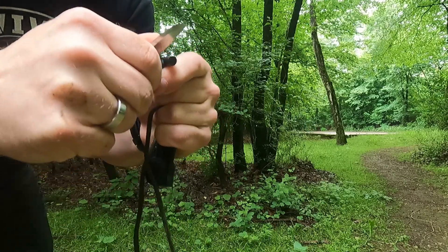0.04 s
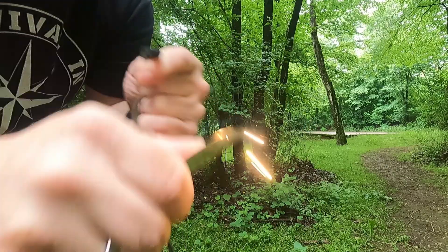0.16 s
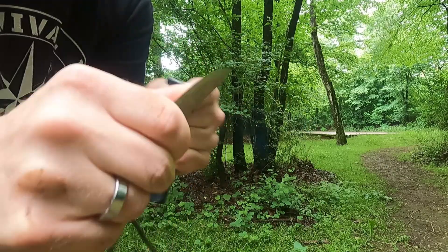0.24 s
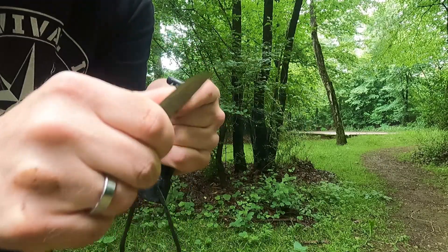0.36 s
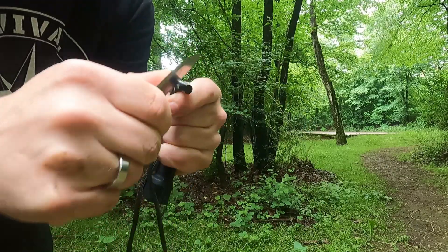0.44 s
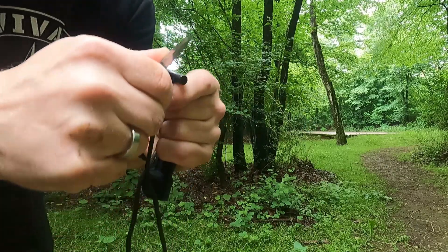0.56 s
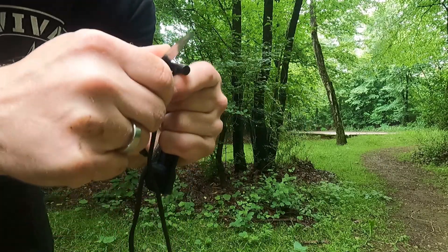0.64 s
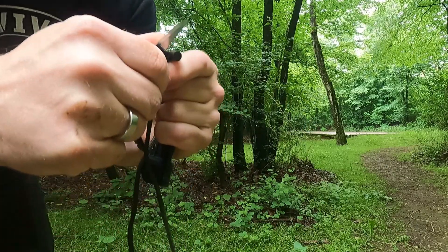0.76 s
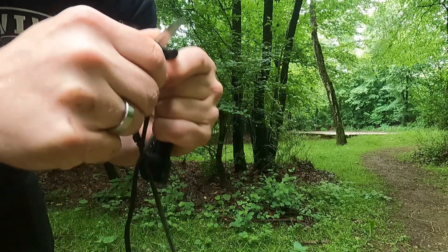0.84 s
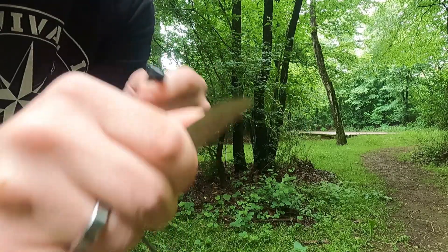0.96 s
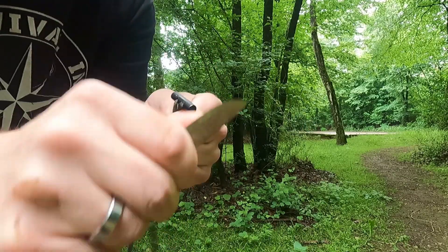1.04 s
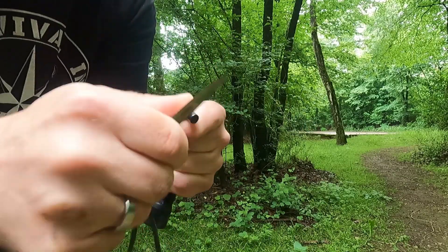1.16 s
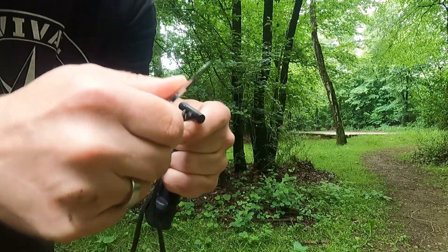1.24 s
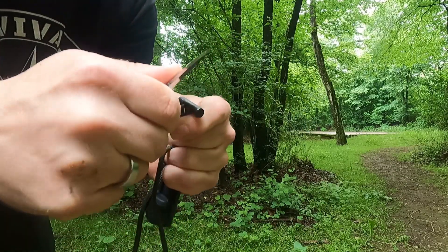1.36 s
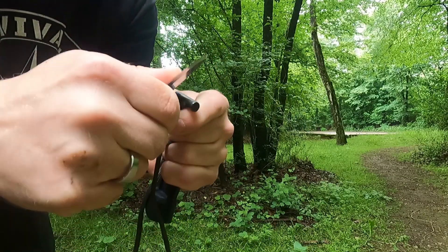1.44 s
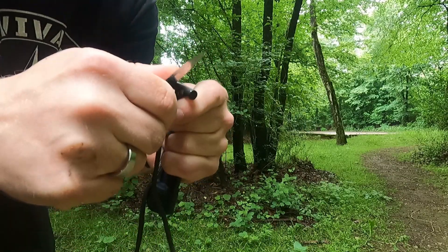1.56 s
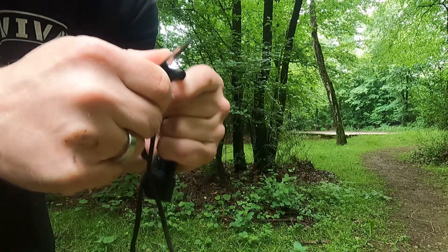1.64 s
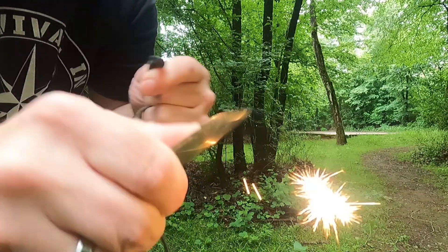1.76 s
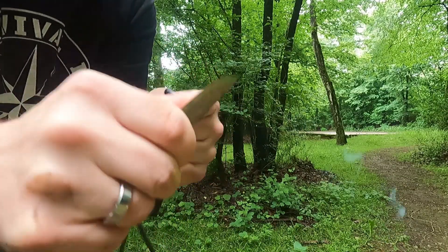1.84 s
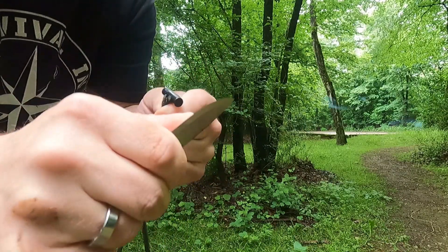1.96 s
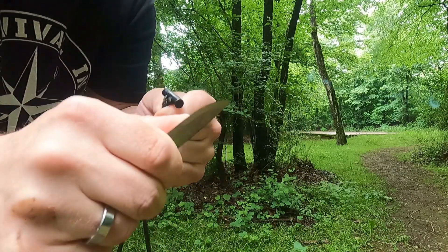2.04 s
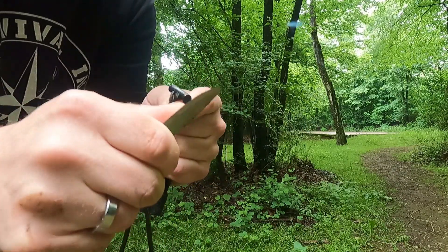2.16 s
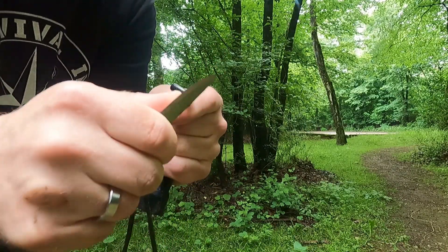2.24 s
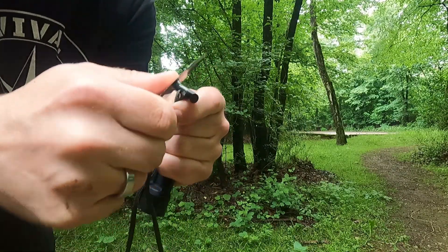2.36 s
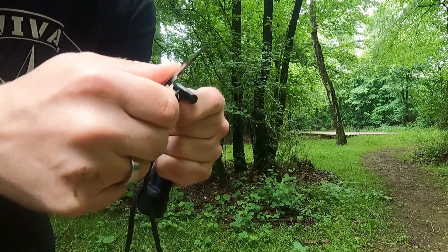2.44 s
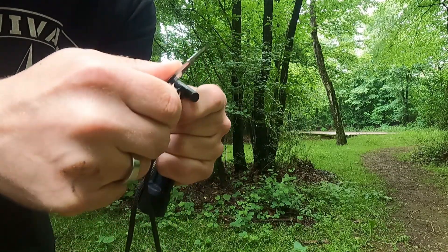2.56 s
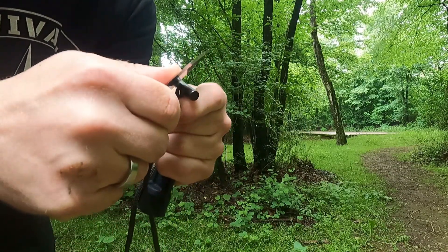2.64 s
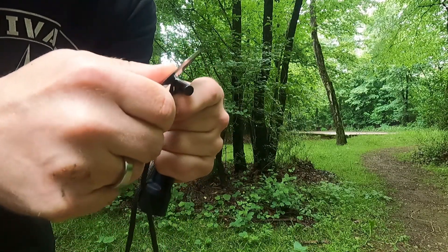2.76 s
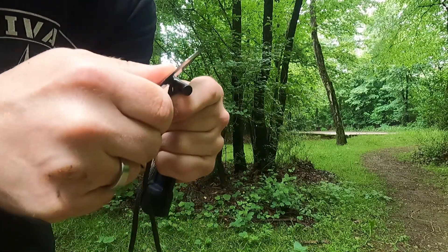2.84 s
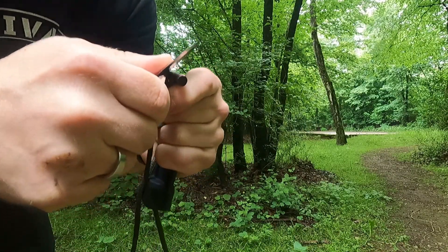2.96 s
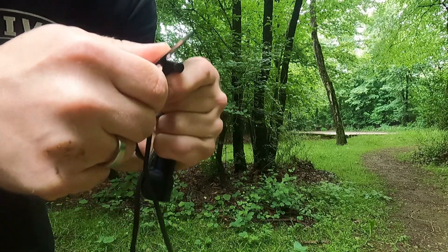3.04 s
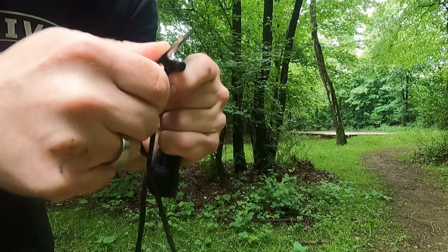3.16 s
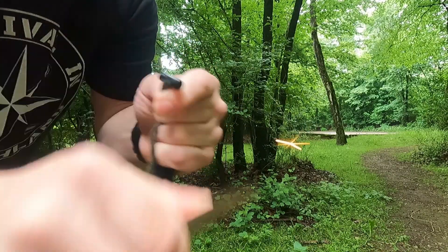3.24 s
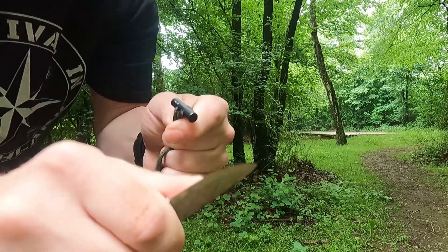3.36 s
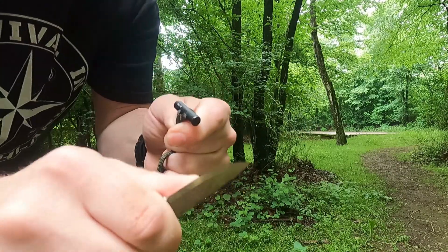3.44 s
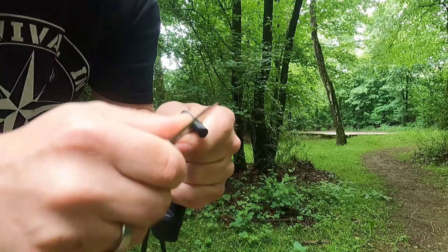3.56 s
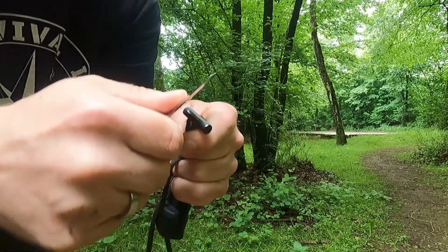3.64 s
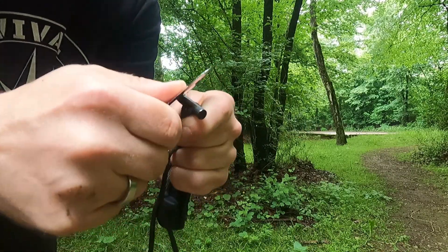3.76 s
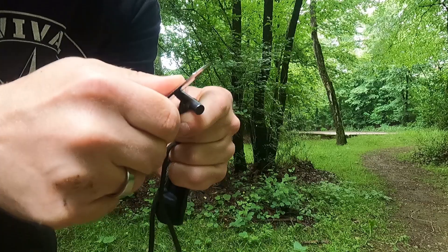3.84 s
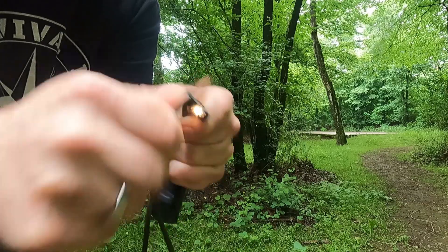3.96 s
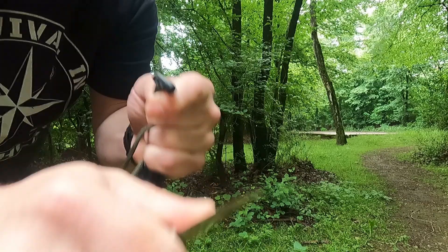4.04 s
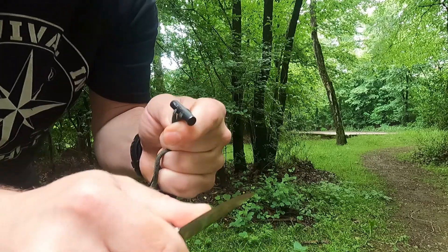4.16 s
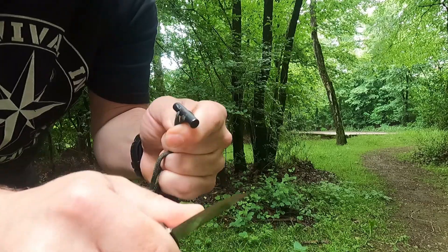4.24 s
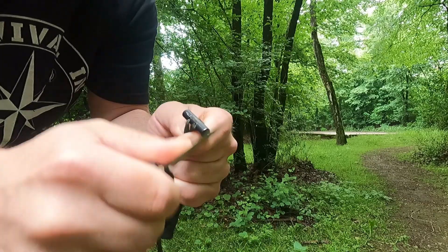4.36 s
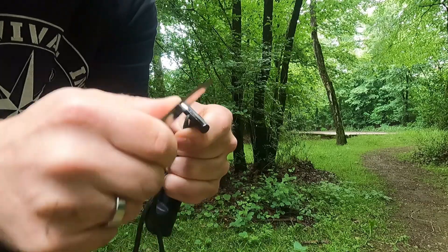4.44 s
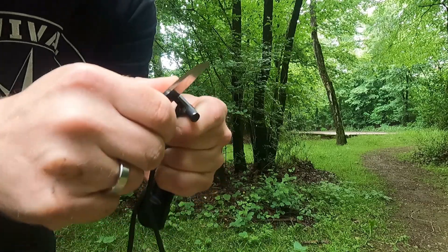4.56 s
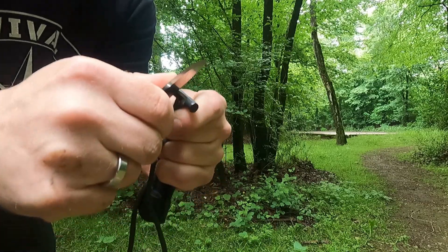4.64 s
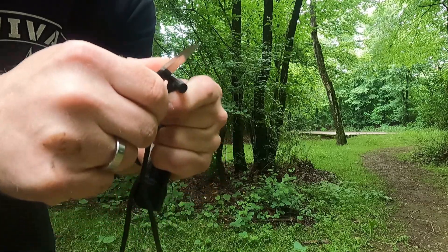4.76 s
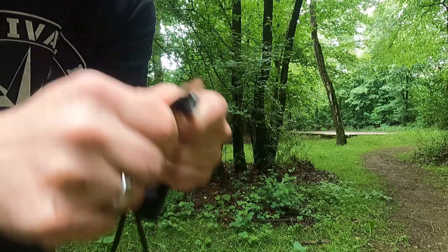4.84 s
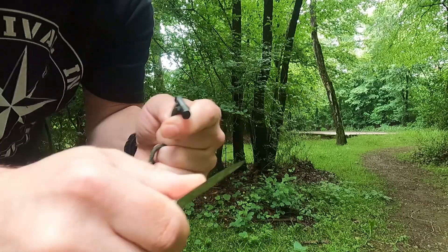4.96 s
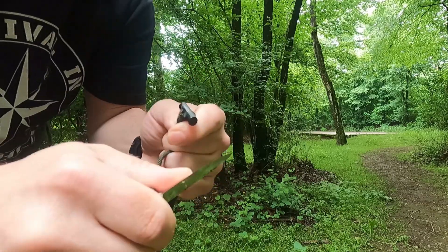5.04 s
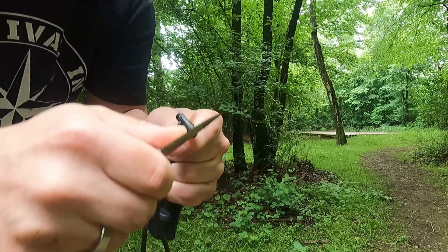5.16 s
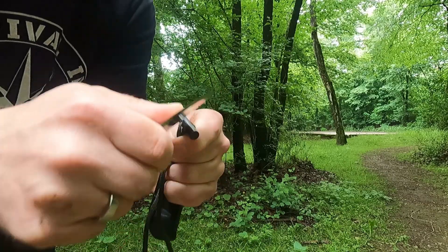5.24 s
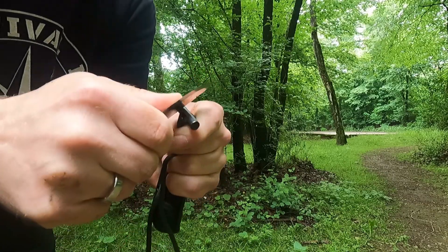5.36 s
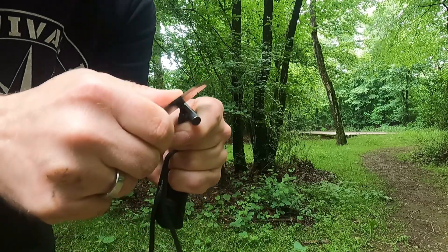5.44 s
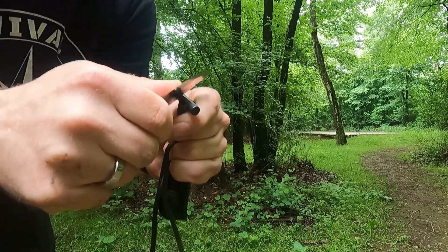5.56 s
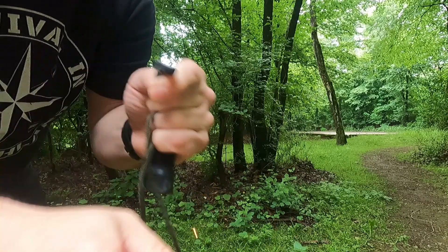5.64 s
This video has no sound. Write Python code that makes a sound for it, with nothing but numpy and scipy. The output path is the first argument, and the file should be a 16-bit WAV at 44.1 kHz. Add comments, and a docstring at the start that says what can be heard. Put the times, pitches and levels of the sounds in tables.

```python
"""A faint bird note and a low hum come first, then a knock: a knife blade on a ferro rod, close to a small camera.
The spine scrapes in short strokes, each a run of noise bursts ringing steel modes; a light knock ends it, set down.
Songbirds are gliding near-sines among trees, whose trunks smear each note through a tail of decaying noise.
Behind them shaped noise makes the air, a far chorus and a low rumble; a wavering hum comes and goes."""
import sys
import numpy as np
from scipy import signal
from scipy.fft import rfft, irfft
from scipy.io import wavfile
from scipy.ndimage import uniform_filter1d

SR = 44100
rng = np.random.default_rng(int(sys.argv[2]) if len(sys.argv) > 2 else 0)


def store_pcm(level_fs):
    """Save levels as 16-bit WAV."""
    pcm = np.round(np.clip(level_fs, -1, 1) * 32767).astype(np.int16)
    wavfile.write(sys.argv[1], SR, np.atleast_2d(pcm).T)


N = 251987


def gain_of(db):
    """dB to amplitude."""
    return 10 ** (np.asarray(db) / 20)


def evened(x):
    """Scales to rms 1."""
    return x / np.sqrt(np.mean(x ** 2) + 1e-20)


def smooth(x, size):
    """Three running means in a row."""
    for _ in range(3):
        x = uniform_filter1d(x, size)
    return x


def read(points, hz):
    """Reads a table on a log-frequency axis."""
    f, value = np.transpose(points)
    return np.interp(np.log(hz + 1), np.log(f + 1), value)


def add(mix, s, sound):
    """Mixes a sound in at s seconds."""
    part = mix[round(s * SR):][:len(sound)]
    part += sound[:len(part)]


def knife():
    """All bites and knocks of blade on rod, as the left and right microphone ports meet them."""
    # Strokes down the rod. Each row: start in seconds, end in seconds, thud of the hands at the end in dB,
    # top ring at its loudest in dB, moment of the loudest top ring in seconds.
    strokes = [(.234, 0.287, -31.5, -36.5, .273), (.998, 1.028, -36.5, -42.5, 1.02),
               (1.825, 1.883, -28, -30.5, 1.855), (1.894, 1.935, -25.5, -33, 1.899),
               (3.328, 3.361, -35.5, -36.5, 3.343), (4.077, 4.131, -27.5, -31, 4.11),
               (4.953, 4.969, -55, -49.5, 4.956), (5.0, 5.005, -61, -44, 5.001),
               (5.032, 5.045, -58, -39.5, 5.033)]
    # Single hard knocks. Each row: start in seconds, level in dB, length in ms, chatter pitch in Hz,
    # top ring in dB against the knock.
    knocks = [(0.0757, -25.5, 1.2, 2630, -41), (0.753, -25, 2.06, 4500, -37), (1.642, -25, 2.9, 4800, -28),
              (2.8065, -29.5, 1.4, 2760, -45), (3.891, -29, 3.7, 4630, -28), (4.643, -39, 2.4, 4500, -32),
              (4.7333, -30, 3, 4450, -34), (5.0086, -20.5, 3.2, 4500, -11), (5.0297, -9.5, 2.7, 4680, -12),
              (5.495, -31.5, 1.4, 4700, -49)]
    knock_thud_db = -23  # against the knock
    rows = [(s, db, ms, hz, knock_thud_db, top_db) for s, db, ms, hz, top_db in knocks]
    for row in strokes:
        rows += stroke(*row)
    out = np.zeros((N, 2))
    draws = rng.standard_normal((len(rows), 3, 2048))
    for row, draw in zip(rows, draws):
        add(out, row[0], bite(row, draw).T)
    return out.T


def stroke(start, end, thud_db, top_db, top_s):
    """In a stroke the edge bites, slips and bites again; hard bites let go sooner and softer ones hold longer."""
    # Bites of the edge. Each row: start in seconds, level in dB, chatter pitch in Hz.
    bites = [(0.236, -30, 3200), (0.2451, -25, 3200), (0.2508, -22, 3220), (0.256, -21.5, 2700),
             (0.2712, -29, 4140), (0.2756, -20.5, 4330), (0.2806, -31.5, 2450), (0.9981, -29, 3000),
             (1.0023, -32, 3460), (1.0049, -24.5, 3120), (1.0109, -18, 2980), (1.019, -37, 2920),
             (1.8265, -35, 3940), (1.831, -30, 3480), (1.8412, -24.5, 3520), (1.85, -18, 4500),
             (1.8555, -18, 4870), (1.86, -29, 3320), (1.87, -20.5, 3280), (1.872, -28.5, 1800),
             (1.8798, -25, 1900), (1.896, -32, 3350), (1.9, -18, 4240), (1.9095, -19.5, 3450),
             (1.9189, -34.5, 2700), (1.9336, -35, 3170), (3.329, -26.5, 3030), (3.335, -22.5, 2900),
             (3.3393, -19.5, 4850), (3.3485, -31, 2800), (3.3583, -29, 4250), (4.0787, -32.5, 5000),
             (4.085, -31.5, 4500), (4.091, -33, 4760), (4.095, -22, 4700), (4.1002, -16.5, 4650),
             (4.1065, -23, 3900), (4.1082, -16.5, 4530), (4.1137, -35, 2600), (4.1219, -21.5, 3600),
             (4.953, -41.5, 3600), (4.999, -35, 5300), (5.032, -28, 4510), (5.042, -34, 3120)]
    thud_rise_db_per_s = 263  # the hands load up along a stroke
    top_fall_db_per_s = 596  # the top ring swells and falls away round its loudest moment
    hold, longest_ms = 0.82, 12.5  # a bite lasts at most this share of the time until the next one
    hard_db, hard_ms, snap = -15.5, 3.54, 1.75  # a bite this hard lets go this soon
    s, db, hz = np.transpose([row for row in bites if start - .003 <= row[0] < end])
    gap_ms = 1000 * np.diff(np.append(s, end))
    ms = np.minimum(hold * gap_ms, longest_ms)
    ms = np.minimum(ms, hard_ms * gain_of(snap * (hard_db - db)))
    # both against the level of the bite
    thud = thud_db - thud_rise_db_per_s * (end - s) - db
    top = top_db - top_fall_db_per_s * abs(s - top_s) - db
    return list(zip(s, db, ms, hz, thud, top))


def bite(row, draw, chatter_db=7, chatter_width_hz=260, grit_db=3.5, tail_ms=4.7, own=0.4):
    """Grains tear off the rod in a burst and ring the steel, and the edge chatters at its own pitch."""
    # Resonances of blade and rod. Each row: pitch in Hz, width in Hz, level in dB.
    steel_modes = [(1610, 710, -6), (2480, 460, 4), (2990, 550, 6.5), (3860, 1550, 4.5), (4730, 640, 6.5),
                   (5550, 450, 2.5), (6530, 1200, -2.5)]
    # Thud of the hands that hold them. Each row: pitch in Hz, width in Hz, level in dB.
    hand_modes = [(300, 290, 0.5), (860, 220, 2), (1290, 283, 0.5)]
    # Top ring, gone through twice. Each row, for one pass: pitch in Hz, width in Hz, level in dB.
    top_modes = [(11180, 4100, 4.5), (11480, 510, -16.5), (14900, 3200, 2)]
    s, db, ms, hz, thud_db, top_db = row
    t = np.arange(len(draw[0])) / SR * 1000  # ms

    press = np.clip(t / (0.87 * ms), 0, 1) ** 0.24 * np.exp(-np.maximum(t - 0.65 * ms, 0) / (0.58 * ms))
    press += 0.11 * np.clip(t / ms, 0, 1) * np.exp(-t / (ms + tail_ms))
    press *= gain_of(grit_db * evened(uniform_filter1d(draw[1], size=9)))  # grains of uneven size
    # a brief contact is one clean knock
    knock = 10. * np.exp(-(ms / 2.8) ** 2) * np.exp(-((t - .7) / .055) ** 2)
    grit = press * draw[0] + knock

    overtone_hz = min(1.85 * hz, 7000)  # the chatter carries one upper partial
    chatter = [(hz, chatter_width_hz, chatter_db), (overtone_hz, chatter_width_hz, chatter_db - 15)]
    # the shortest waves reach each port by their own path
    own_grit = own * press * draw[2]
    left_top = ring(ring(grit - own_grit, top_modes), top_modes)
    right_top = ring(ring(grit + own_grit, top_modes), top_modes)
    parts = ring(grit, steel_modes) + ring(grit, chatter), ring(grit, hand_modes), left_top, right_top

    # each part is set to rms 1 over the contact before its level
    loud = slice(0, round(max(ms, 1) * SR / 1000) + 40)
    steel, thud, *top = (p / np.sqrt(np.mean(p[loud] ** 2)) for p in parts)
    return gain_of(db) * (steel + gain_of(thud_db) * thud + gain_of(top_db) * np.array(top))


def ring(x, modes):
    """Sum of two-pole resonances of alternating sign."""
    out = np.zeros(len(x))
    for k, (hz, width, db) in enumerate(modes):
        r = np.exp(-np.pi * width / SR)
        poles = [1, -2 * r * np.cos(2 * np.pi * hz / SR), r * r]
        out += (-1) ** k * gain_of(db) * signal.lfilter([1 - r, 0, r - 1], poles, x)
    return out


def birds(waver=.004, flutter_db=3.0, leaves=.035):
    """Near sines with a slight waver and a faint overtone; returns the direct sound and the part sent to the trees."""
    # The clearest bird notes. Each row: start in seconds, length in seconds, pitch in Hz at start, middle and end,
    # level in dB, swell over the note in dB, echo from the trees in dB against the note.
    notes = [(0, 0.067, 2985, 2760, 2700, -47, -5, -4), (.168, 0.021, 4330, 3620, 3440, -38.5, 9, -7),
             (.32, 0.098, 2400, 2280, 1980, -50.5, -1, -2.5),
             (.589, 0.056, 2393, 2720, 3290, -43.5, 11, -2.5),
             (.63, 0.072, 3560, 3575, 3620, -31.5, 4, -14.5), (.698, .019, 3616, 3473, 3180, -33.5, 4, -16),
             (.83, 0.013, 4010, 4220, 4240, -45, 9, 0.5), (1.035, 0.044, 4500, 4410, 4390, -45, -5, -5),
             (1.068, 0.028, 3460, 3730, 3350, -38.5, 15, -10.5),
             (1.31, 0.033, 3750, 3760, 3700, -48.5, 11, -8), (1.551, 0.039, 4310, 4400, 3990, -44, 7, 3),
             (1.61, 0.044, 4200, 3830, 3200, -36, -5, -5), (1.665, 0.012, 3420, 3920, 4180, -35.5, -7, -4),
             (1.73, 0.035, 4005, 3970, 4290, -38, 3, -5), (2.075, 0.033, 3810, 5070, 4030, -43, 8, 0),
             (2.11, 0.08, 5150, 5210, 5300, -51, 2, -2), (2.17, .09, 5450, 5510, 5430, -54.5, 0, 1),
             (2.225, .026, 4040, 4090, 4100, -37, 4, -13), (2.355, 0.021, 3220, 3360, 3680, -47, 6, -4),
             (2.415, .017, 4015, 3980, 4090, -38.5, -1, -3), (2.478, 0.025, 3883, 3620, 2650, -43, 1, -16),
             (2.545, 0.019, 3780, 3830, 3760, -36, 4, -10.5), (2.69, .26, 4582, 4440, 4470, -49.5, -24, 4),
             (3.045, 0.044, 1860, 2310, 1910, -51, -10, 0),
             (3.071, 0.055, 3670, 3880, 3860, -42.5, -13.5, -3.5),
             (3.21, 0.03, 2660, 2650, 2900, -48.5, 0, -7), (3.24, 0.091, 2170, 2070, 1946, -52.5, 6, -4),
             (3.399, 0.25, 3315, 3220, 3210, -58, 3, 1), (3.688, .012, 3300, 3700, 3840, -39.5, -8, -2.5),
             (3.769, 0.066, 5410, 4720, 2590, -46.5, 18.5, -3),
             (3.935, .031, 4990, 4900, 4580, -46.5, 10, -0.5), (3.92, .21, 3580, 3630, 3670, -53.5, 4, -16),
             (3.98, 0.1, 1883, 2140, 2260, -50, -5, -5), (4.132, 0.055, 3884, 3700, 3020, -34.5, -12, -1),
             (4.159, 0.071, 1936, 1830, 1610, -49, -5, -5),
             (4.305, 0.026, 3570, 3600, 3354, -37.5, -1, -21), (4.303, .03, 6200, 5790, 5500, -45.5, 7, 1),
             (4.333, 0.0295, 5500, 5500, 5400, -41.5, 4, 1), (4.349, 0.042, 5350, 4100, 3930, -40, -7, 0),
             (4.43, 0.041, 2194, 1970, 2010, -44, 11, -8.5),
             (4.448, 0.086, 4530, 4260, 3980, -39.5, -19.5, 2.5),
             (4.481, 0.052, 3040, 2910, 2720, -41, 1, -4), (4.645, 0.053, 5040, 4860, 4920, -41.5, 1, -2),
             (4.669, .036, 4875, 3990, 3810, -35, 6, 0.5), (4.4, 0.013, 2780, 3000, 3000, -44.5, -9, -11),
             (4.84, .03, 2130, 2100, 1920, -51, -12, -8), (4.81, 0.029, 2584, 3020, 2800, -42.5, -6, -4),
             (5.089, 0.028, 3830, 3930, 3700, -35.5, -1, 1), (5.16, .11, 1533, 1840, 2027, -52.5, 12, -6),
             (5.27, .1, 1900, 1660, 2030, -54, 1, -10), (5.205, 0.035, 4600, 3840, 3380, -45.5, 6, 6.5),
             (5.23, 0.046, 3092, 3090, 3130, -46.5, -2, -1.5), (5.344, 0.042, 4020, 3980, 3910, -40, 2, 3),
             (5.49, 0.028, 3875, 3850, 3390, -40.5, 3, -5), (5.562, .033, 3690, 3750, 3610, -37.5, 5, -7)]
    # Bouts of quick twitter from a bird deeper in the wood. Each row: start in seconds, length in seconds,
    # pitch in Hz at start and end, level in dB.
    bouts = [(1.45, 0.14, 5040, 5000, -48.5), (1.66, 0.15, 3950, 3900, -46), (2.12, .5, 4100, 3800, -46.5),
             (2.13, 0.34, 5000, 4600, -50), (4.18, 0.13, 3700, 3600, -50), (4.7, .2, 4000, 3700, -50.5),
             (5.12, 0.57, 3950, 4000, -42.5), (5.22, .45, 3600, 3500, -48), (3.5, .3, 2850, 2750, -52),
             (3.7, .12, 4800, 4800, -53), (.44, .08, 4800, 3700, -53)]
    overtone_db, overtone_db_per_khz = -29, 14  # at 5.5 kHz; lower notes are purer
    near, far = np.zeros(N), np.zeros(N)
    wobble = evened(smooth(rng.standard_normal((2, N)), size=120))
    rows = list(notes)
    for bout in bouts:
        rows += twitter(*bout)
    for s, length, start, middle, end, db, swell_db, echo_db in rows:
        u = np.linspace(0, 1, round(length * SR))  # place within the note
        jitter, flutter = wobble[:, rng.integers(N - SR):][:, :len(u)]
        bend = (2 * middle - start - end) * 2 * u * (1 - u)
        pitch = (start + (end - start) * u + bend) * (1 + waver * jitter)
        level = gain_of(db + swell_db * (u - .5) + flutter_db * flutter)
        edge_s = np.minimum(u, 1 - u) * length
        fade = np.sin(np.pi / 2 * np.clip(edge_s / 0.0021, 0, 1)) ** 2
        # echoes of short chirps come back smeared, long whistles stay thin
        blur = leaves * np.exp(-length / 0.071)
        turn = 2 * np.pi * np.cumsum([pitch, pitch * (1 + blur * flutter)], axis=1) / SR
        overtone = gain_of(overtone_db + overtone_db_per_khz * (pitch / 1000 - 5.5))
        note, echoed = np.sqrt(2) * level * fade * (np.sin(turn) + overtone * np.sin(2 * turn))
        add(near, s, note)
        add(far, s, gain_of(echo_db) * echoed)
    return near, far


def twitter(s, length, first_hz, last_hz, db, uneven_db=4.0):
    """Short notes at loose moments, scattered round a drifting pitch."""
    notes_per_s, note_s, spread, echo_db = 24, .016, .035, 1  # spread is a share of the pitch
    rows = []
    for k, draw in enumerate(rng.standard_normal((40, 6))):
        at = max(k + .3 * draw[0], 0) / notes_per_s
        if at < length:
            drifting_hz = first_hz + (last_hz - first_hz) * at / length
            start, middle, end = drifting_hz * (1 + spread * (draw[1] + draw[2:5]))
            rows.append((s + at, note_s, start, middle, end, db + uneven_db * draw[5], 0, echo_db))
    return rows


def trees(x, build_s=0.019):
    """Scatter from trunks and leaves: noise that builds up briefly, then each band dies at its own speed."""
    # Dying away among the trees. Each row: frequency in Hz, time to fall by 60 dB in seconds.
    decay = [(1500, 0.25), (3000, 0.96), (6000, 0.59)]
    hz, t, z = signal.stft(rng.standard_normal(SR), SR, nperseg=256)
    shape = np.clip(t / build_s, 0, 1) * gain_of(-60 * t / read(decay, hz)[:, None])
    tail = signal.istft(z * shape, SR, nperseg=256)[1]
    return signal.fftconvolve(x, tail / np.linalg.norm(tail))[:N]


def wood(patchy_db=1.0, chorus_patchy_db=2.5):
    """Steady air, a rumble that swells, and many far birds blurred into streaks, all as shaped noise."""
    # Spectrum shapes of air, far chorus and rumble. Each row: frequency in Hz, relative density in dB.
    air_shape = [(15, -42), (28, -38), (74, 2), (200, -1.5), (575, -5), (936, -9.5), (1440, -8),
                 (3620, -6.5), (4870, -15.5), (7110, -22.5), (8600, -32), (10000, -36.5), (12200, -31.5),
                 (13300, -36), (13800, -68), (16000, -72)]
    chorus_shape = [(1500, -86), (2300, 4.5), (3500, 4.5), (4800, 3), (6500, -6), (8500, -140)]
    rumble_shape = [(90, -45), (150, -3), (280, 6), (420, -2.5), (700, -44.5)]
    # Swells of the wood. Each row: time in seconds, low rumble in dB, far chorus in dB (both before trim_db).
    swell = [(0.0, -58, -45), (1.53, -48, -46.5), (1.73, -54, -41.5), (2.0, -87, -60), (2.38, -50.5, -49),
             (3.231, -44, -45), (3.669, -48, -48), (4.53, -46.5, -46), (4.93, -42, -44), (5.28, -67, -50),
             (5.71, -58, -51.5)]
    # How alike the two ports hear the wood. Each row: frequency in Hz, left-right likeness from 0 to 1.
    likeness = [(7000, .9999), (9500, .97), (11500, .75), (15000, .4)]
    air_db, trim_db = -47, -5.5
    frames, hz = N // 256 + 5, np.fft.rfftfreq(1024, 1 / SR)
    a, b, c, d, p, q = rng.standard_normal((frames, 513, 6)).T
    # uneven over frequency (axis 0) and time (axis 1)
    patches = evened(uniform_filter1d(uniform_filter1d(p, size=12, axis=0), size=14, axis=1))
    streaks = evened(uniform_filter1d(uniform_filter1d(q, size=7, axis=0), size=16, axis=1))

    s, rumble_db, chorus_db = np.transpose(swell)
    t = np.arange(frames) * 256 / SR
    rumble_level = gain_of(np.interp(t, s, rumble_db) + trim_db + 1.25 * streaks)
    chorus_level = gain_of(np.interp(t, s, chorus_db) + trim_db)
    air = evened(gain_of(read(air_shape, hz)))[:, None] * gain_of(air_db + patchy_db * patches)
    rumble = evened(gain_of(read(rumble_shape, hz)))[:, None] * rumble_level
    chorus = evened(gain_of(read(chorus_shape, hz)))[:, None] * chorus_level
    chorus = chorus * gain_of(chorus_patchy_db * streaks)
    size = np.sqrt(air ** 2 + rumble ** 2 + chorus ** 2)

    same = np.clip(read(likeness, hz), -1, 1)[:, None]
    left = a + 1j * b
    right = same * left + np.sqrt(1 - same ** 2) * (c + 1j * d)
    unit = np.std(signal.istft(left, nperseg=1024, noverlap=768)[1])
    z = np.array([left, right])
    return signal.istft(z * size, nperseg=1024, noverlap=768)[1][:, :N] / unit


def hum(waver=0.041):
    """Faint low sines of wavering pitch that swell and fade."""
    # Stretches of hum. Each row: start in seconds, length in seconds, pitch in Hz, level in dB.
    stretches = [(0, 0.63, 95.7, -58), (.95, 0.57, 99.6, -53.5), (3.18, 0.22, 149.1, -51.5),
                 (3.5, 0.27, 148, -59), (4.9, 0.41, 147.5, -54.5)]
    out = np.zeros(N)
    wobble = evened(smooth(rng.standard_normal(N), size=1500))
    for s, length, hz, db in stretches:
        pitch = hz * (1 + waver * wobble[round(s * SR):][:round(length * SR)])
        tone = np.sin(2 * np.pi * np.cumsum(pitch) / SR)
        add(out, s, np.sqrt(2) * gain_of(db) * tone * signal.windows.tukey(len(pitch), .6))
    return out


def scene():
    """Knife close by, birds among the trees, the wood behind."""
    # The right port faces the hands. Each row: frequency in Hz, level above the left port in dB.
    right_port = [(9500, 0), (10500, 1.5), (11800, 5.5), (15000, 4)]
    steel = knife()
    near, far = birds()
    close = steel + near + trees(far + gain_of(-25.5) * steel.mean(0))
    lean_db = read(right_port, np.fft.rfftfreq(N, 1 / SR))
    leaning = irfft(rfft(close) * gain_of([-lean_db / 2, lean_db / 2]), N)
    return leaning + wood() + hum()


def record(dry):
    """The microphone housing cancels a band near 9 kHz and loses the highest treble; then the band limit."""
    # Treble lost in the housing. Each row: frequency in Hz, gain in dB.
    treble_fall = [(12600, -1), (13600, -19), (15300, -29), (16000, -45)]
    notch_hz, notch_width_hz, notch_depth = 9060, 360, 0.73  # depth is the share of amplitude cancelled
    edge_hz = 16000
    hz = np.fft.rfftfreq(N, 1 / SR)
    notch = 1 - notch_depth * np.exp(-((hz - notch_hz) / notch_width_hz) ** 2)
    housed = irfft(rfft(dry) * notch * gain_of(read(treble_fall, hz)), N)
    band_limit = signal.firwin(511, edge_hz, window=("kaiser", 9), fs=SR)
    return signal.oaconvolve(np.clip(housed, -1, 1), band_limit[None], "same")


dry = scene()
out = record(dry)
store_pcm(out)
```